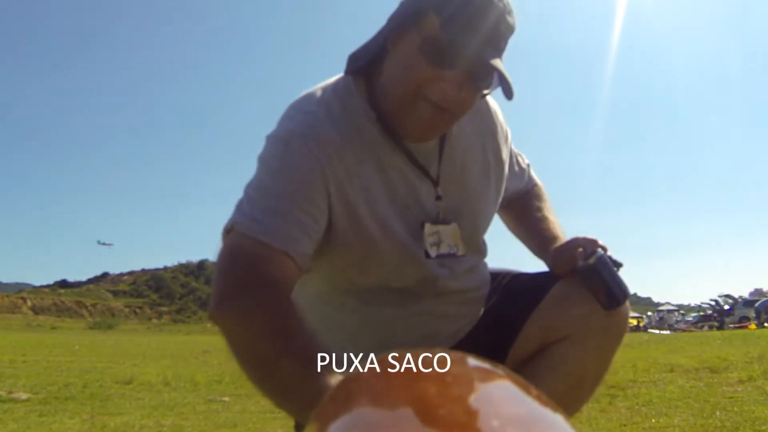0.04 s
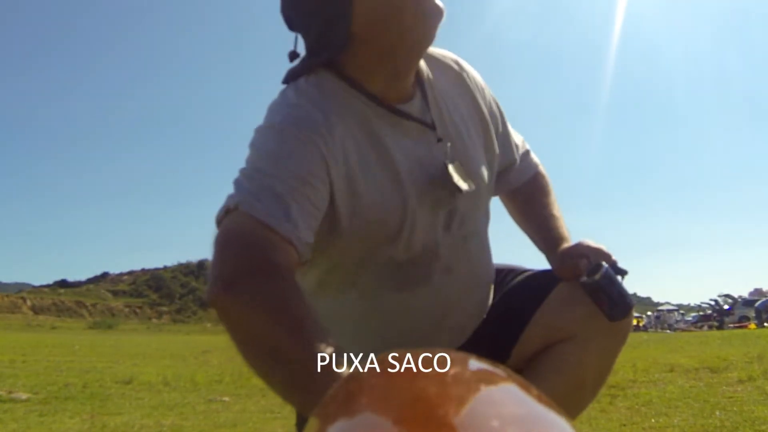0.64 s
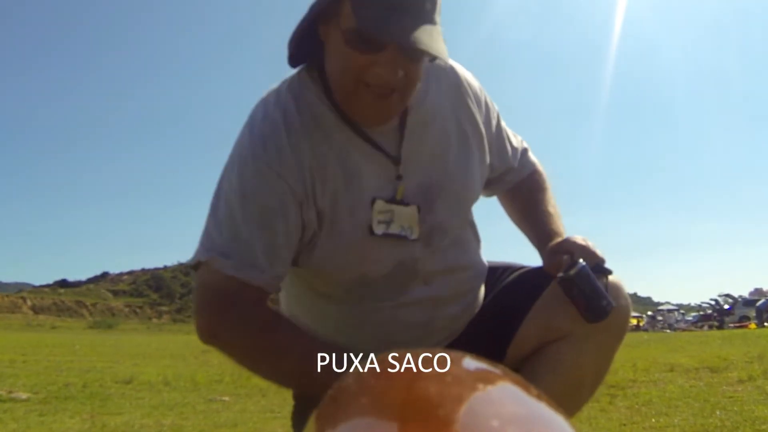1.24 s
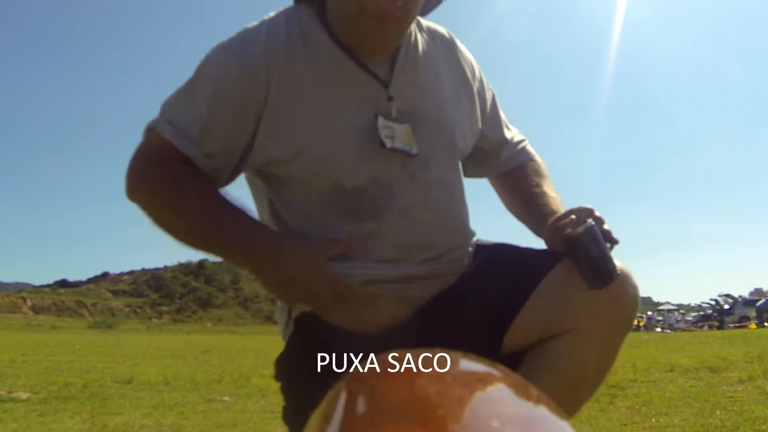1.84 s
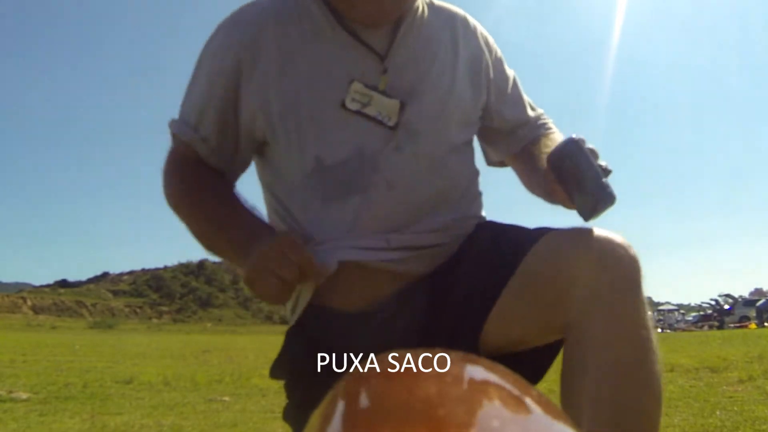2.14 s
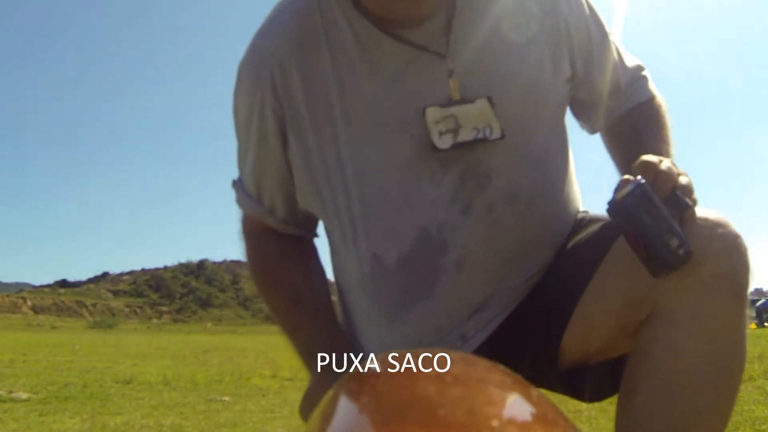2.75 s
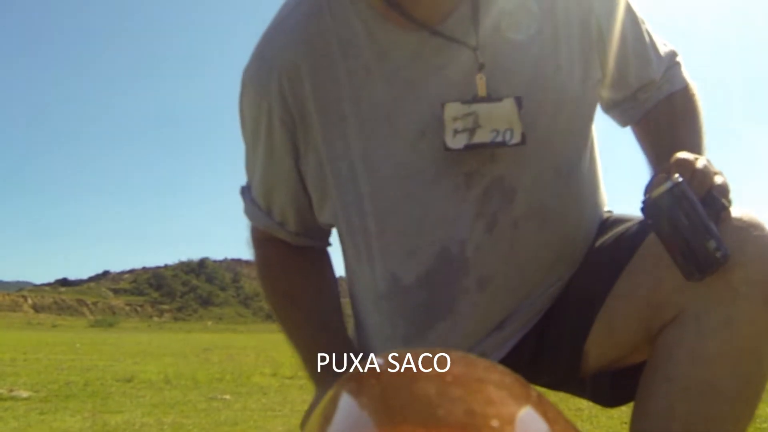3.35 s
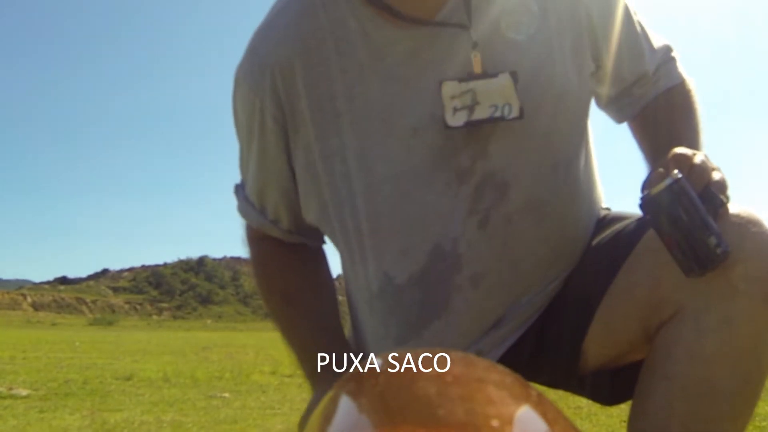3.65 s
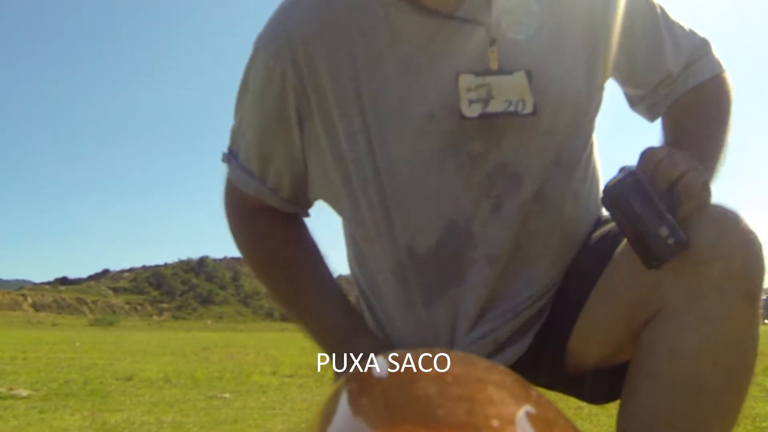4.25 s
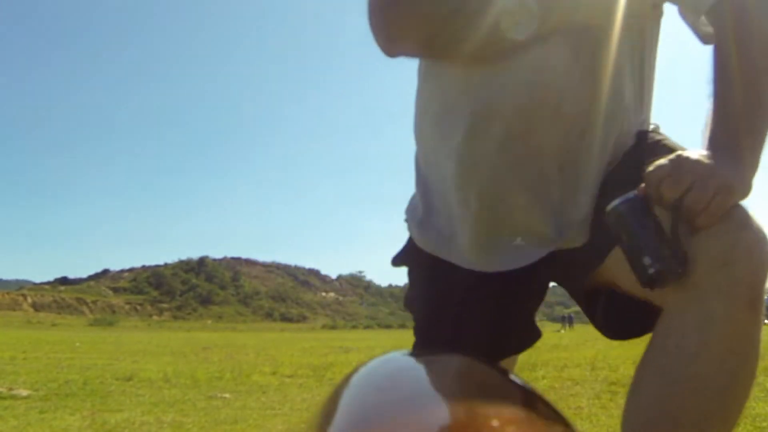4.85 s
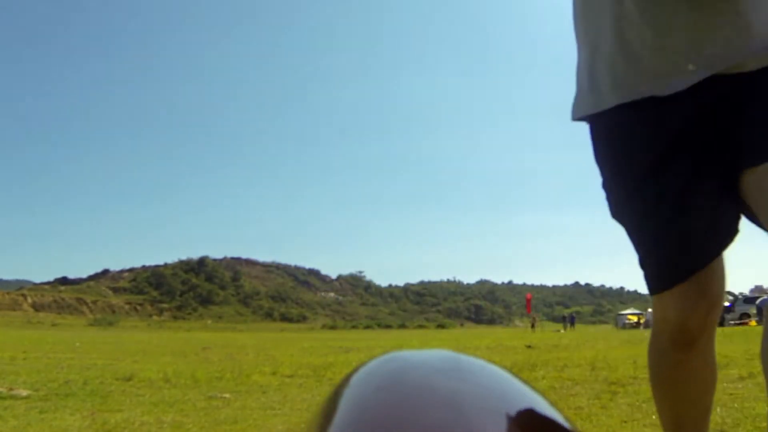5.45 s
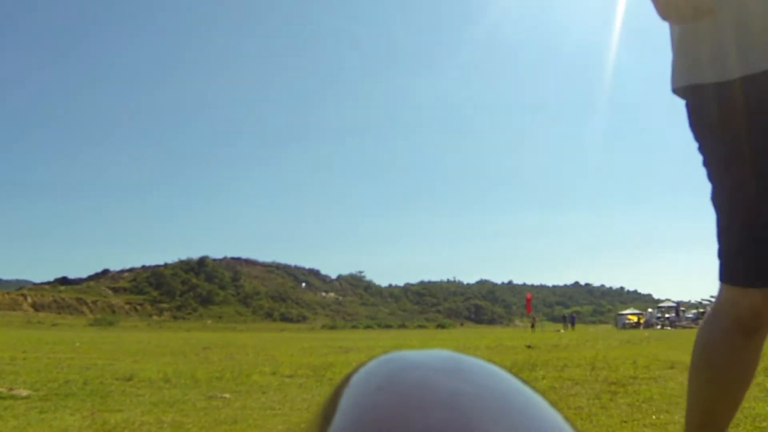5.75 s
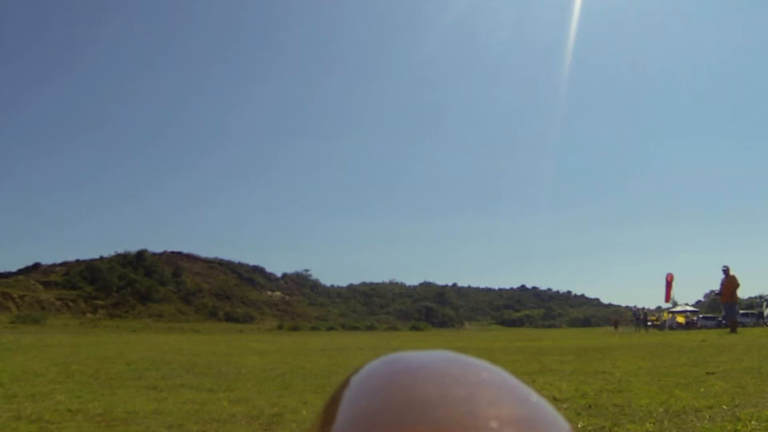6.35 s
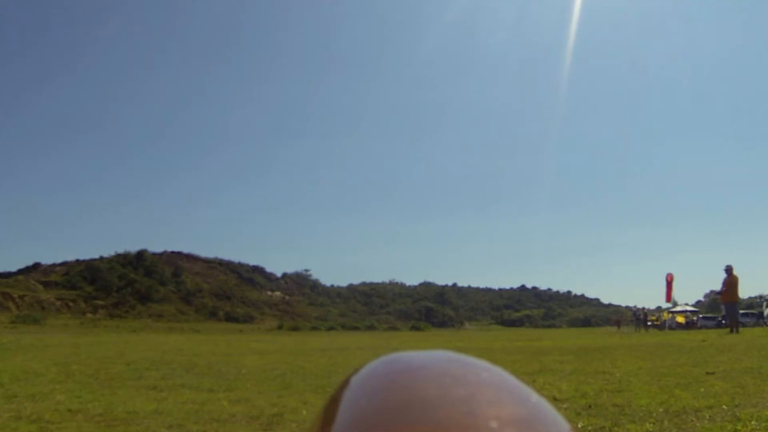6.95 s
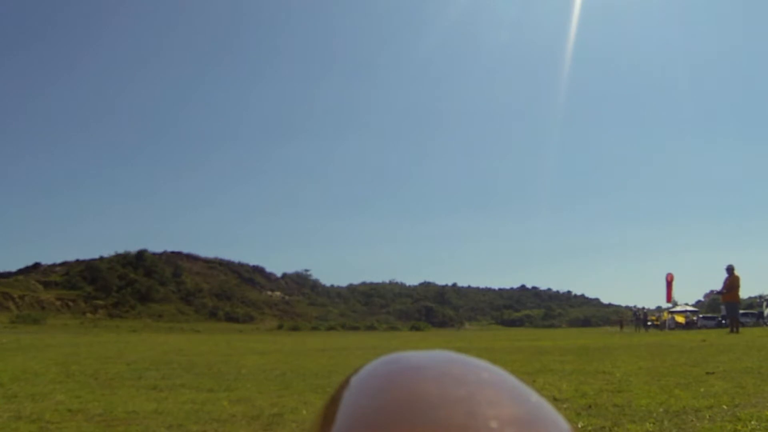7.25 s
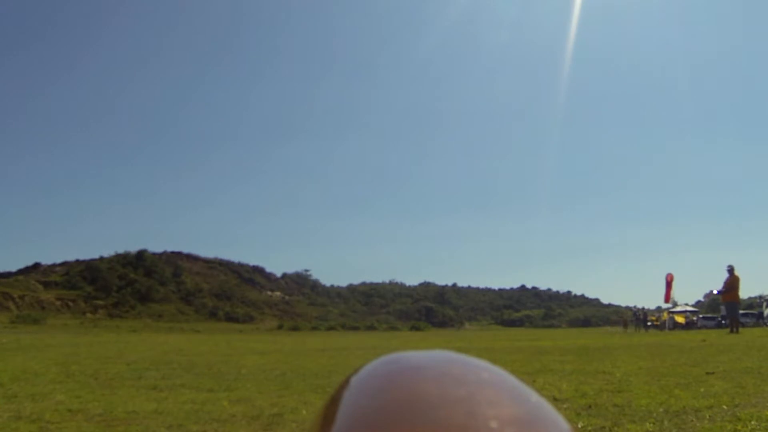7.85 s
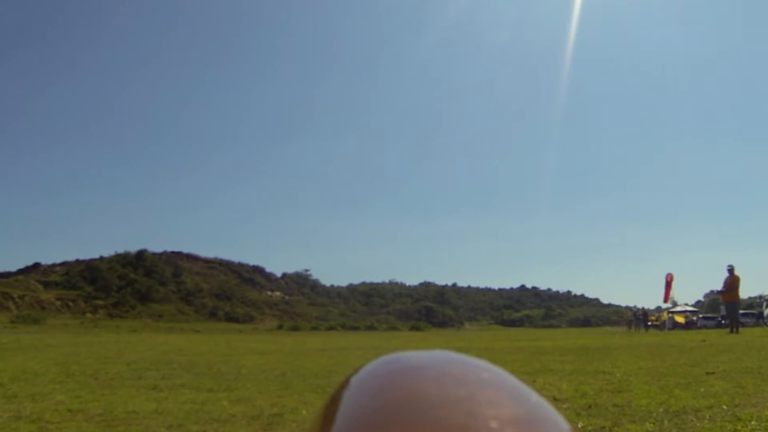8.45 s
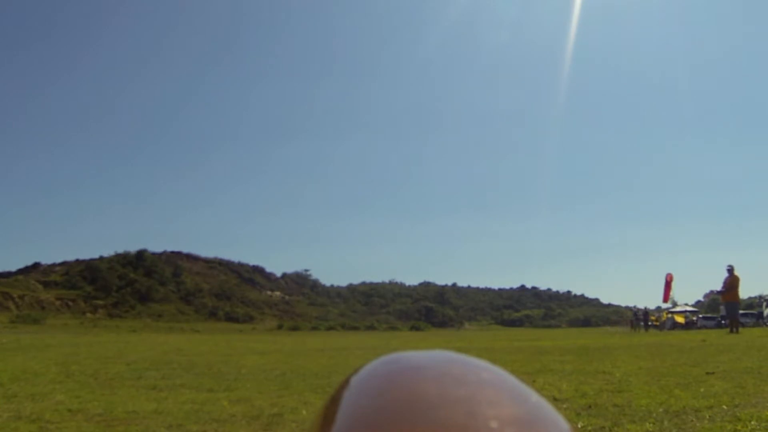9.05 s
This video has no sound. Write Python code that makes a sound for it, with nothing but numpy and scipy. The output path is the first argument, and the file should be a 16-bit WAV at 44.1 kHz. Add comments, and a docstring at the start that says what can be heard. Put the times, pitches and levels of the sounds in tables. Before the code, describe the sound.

A model jet's small turbine idles close up with a high whistle and airy roar, then abruptly spools up for take-off.

```python
"""A model jet's small turbine, close up, from a mono camera microphone riding on the fuselage.
It idles on a grass field: twelve compressor blades whistle over the shaft's overtones and the exhaust roar.
After a hard cut it spools up for take-off: the whistle climbs out of hearing, the roar surges,
and the wheels rumble up through the airframe."""
import sys
import numpy as np
from scipy import signal
from scipy.fft import rfft, irfft, next_fast_len
from scipy.io import wavfile
from scipy.ndimage import uniform_filter1d

SR = 44100
rng = np.random.default_rng(int(sys.argv[2]) if len(sys.argv) > 2 else 0)


def unload_audio(sound):
    """Save the sound as a 16-bit wav file, at the path given as the first command line argument."""
    columns = np.transpose(np.atleast_2d(sound))
    # keep every value between -1 and 1, then stretch to whole-number steps
    steps = np.round(np.clip(columns, -1, 1) * 32767)
    wavfile.write(sys.argv[1], SR, steps.astype(np.int16))


N = 401310
TIME = np.arange(N) / SR
CUT_S = 6.251  # from idle to the take-off roll


def undb(db):
    """Decibels to gain."""
    return 10 ** (np.asarray(db) / 20)


def unit(x):
    """Scale to rms 1."""
    return x / np.sqrt(np.mean(x ** 2))


def curve(table, at=TIME):
    """Read a two-column table, its points joined by lines."""
    return np.interp(at, *np.transpose(table))


def walk(rate):
    """Smooth random wandering with about `rate` turns a second; spread near 1."""
    steps = rng.standard_normal(4096)
    place = TIME * rate
    k = place.astype(int)
    fraction = place - k
    ease = fraction * fraction * (3 - 2 * fraction)
    return steps[k % len(steps)] * (1 - ease) + steps[(k + 1) % len(steps)] * ease


def swell(crest_s, build_s, release_s):
    """Builds up exponentially to 1 at its crest, then rounds off and dies."""
    since = TIME - crest_s
    return np.exp(np.minimum(since, 0) / build_s - (np.maximum(since, 0) / release_s) ** 2)


def turbulence(spectrum, flicker_db, flicker_rate):
    """Octave bands of noise that each flicker alone; rms 1."""
    size = next_fast_len(N, True)
    f = np.maximum(np.fft.rfftfreq(size, 1 / SR), 1)
    hz, db = np.transpose(spectrum)
    noise = rfft(rng.standard_normal(size)) * undb(np.interp(np.log(f), np.log(hz), db))
    noise *= f ** 2 / (f ** 2 + 20 ** 2)  # low cut at 20 Hz
    octave = np.clip(np.round(np.log2(f / 1500)), -4, 3)
    bands = (irfft(noise * (octave == k), size)[:N] for k in np.unique(octave))
    return unit(sum(band * undb(flicker_db * walk(flicker_rate)) for band in bands))


# Dips of the camera's automatic gain: t/s, depth/dB
GAIN_DIPS = [(1.02, 0.3), (4.04, 1.0)]

def camera_gain_dip_db():
    """The camera's gain steps the level down briefly at the listed times, then recovers."""
    return sum(depth_db * swell(s, build_s=0.05, release_s=0.53) for s, depth_db in GAIN_DIPS)


# Wheel rumble, reaching the microphone through the airframe: f/Hz, relative level/dB
WHEEL_SPECTRUM = [(25, -10), (60, 0), (100, -0.5), (190, -1.5), (300, -2), (600, -12), (2000, -46)]

def wheels():
    """Small wheels bump over the turf below, louder as the model gathers speed."""
    start_db, rise_db_per_s, ceiling_db = -57.5, 10, -38
    roll_db = np.minimum(start_db + rise_db_per_s * (TIME - CUT_S), ceiling_db)
    return turbulence(WHEEL_SPECTRUM, flicker_db=2.0, flicker_rate=18) * undb(roll_db)


# Resonances and dips of the fuselage and camera housing: f/Hz, width/Hz, gain/dB
SHELL_BANDS = [(960, 69, -3), (1135, 59, 2), (1232, 57, -4), (1358, 167, -3), (1615, 78, 4), (1824, 134, 9),
               (2112, 173, 6.5), (3130, 140, 2), (5175, 540, 6.5), (5980, 240, -0.5), (6640, 330, 5.5),
               (7370, 810, -10.5), (8650, 250, 2.3), (10400, 320, -6)]

def housing(x):
    """The hollow shell at the microphone lifts some bands and cancels others; rms 1."""
    size = next_fast_len(N, True)
    f = np.fft.rfftfreq(size, 1 / SR)
    db = sum(lift * np.exp(-((f - hz) / width) ** 2) for hz, width, lift in SHELL_BANDS)
    return unit(irfft(rfft(x, size) * undb(db))[:N])


# Exhaust at idle: f/Hz, relative level/dB
IDLE_SPECTRUM = [(30, -15), (75, -8.5), (200, -9.5), (400, -1.1), (750, 0.5), (1500, -4.5), (2600, -7.5),
                 (4000, -10.5), (6000, -14.5), (9000, -14), (11500, -16.5), (15000, -29.5)]

def idle_exhaust(roar_db):
    """The turbulent jet roars evenly, heard close through the housing."""
    roar = housing(turbulence(IDLE_SPECTRUM, flicker_db=0.33, flicker_rate=14))
    return roar * undb(roar_db + 0.3 * walk(12))


# Exhaust with the throttle opening, and at full thrust: f/Hz, relative level/dB
OPENING_SPECTRUM = [(30, -17), (80, -11), (200, -13), (400, -2), (800, 1.5), (1500, -5.5), (2800, -8),
                    (4000, -14), (5500, -18.5), (9000, -11.5), (11500, -17.5), (15000, -33)]
THRUST_SPECTRUM = [(30, -14), (80, -18), (200, -11.5), (400, -4), (750, 1), (1500, -2), (2800, -5.5),
                   (4000, -11), (5500, -21), (9000, -10.5), (11500, -12.5), (15000, -28)]

def takeoff_exhaust(shaft_hz, roar_db):
    """The jet takes on the colour of full thrust as the shaft speeds up."""
    thrust = np.clip((shaft_hz - 980) / 200, 0, 1)
    opening = turbulence(OPENING_SPECTRUM, flicker_db=0.5, flicker_rate=16)
    full = turbulence(THRUST_SPECTRUM, flicker_db=1.0, flicker_rate=16)
    roar = housing(np.sqrt(1 - thrust) * opening + np.sqrt(thrust) * full)
    return roar * undb(roar_db + 0.44 * walk(55))


# Exhaust surges on the roll across the field: crest t/s, level/dB, build-up/s
EXHAUST_SURGES = [(6.52, -19.5, .11), (7.43, -21, 0.23), (7.61, -23, 0.096), (7.9, -20.5, 0.12),
                  (8.23, -21.5, 0.15), (8.35, -23, 0.069), (9.07, -23, .16)]

def surging_roar_db(floor_db=-29):
    """The roar's level: surges add their power to a steady floor."""
    surge_power = sum(undb(db) ** 2 * swell(crest_s, build_s, release_s=0.11)
                      for crest_s, db, build_s in EXHAUST_SURGES)
    return 10 * np.log10(undb(floor_db) ** 2 + surge_power)


def rotor(shaft_hz, whistle_db, hum_db, overtones, fade_db, fade_rate, wander, shimmer_db, blades=12):
    """Tones locked to one shaft: its hum, the blade whistle, and overtones that fade in and out."""
    # the rotor's inertia rounds every change of speed
    speed_hz = uniform_filter1d(shaft_hz, size=9000, mode="nearest") * (1 + wander * walk(14))
    angle = 2 * np.pi * np.cumsum(speed_hz) / SR
    # eddies in the intake shake the whistle slightly in phase and strength
    tones = undb(whistle_db + shimmer_db * walk(45)) * np.sin(blades * angle + 0.03 * walk(160))
    tones += undb(hum_db + 1.1 * walk(14)) * np.sin(angle)
    for multiple, db in overtones:
        tones += undb(db + fade_db * walk(fade_rate)) * np.sin(multiple * angle + 0.28 * walk(40))
    return np.sqrt(2) * tones


# The idling shaft sags and recovers: t/s, f/Hz
IDLE_SHAFT = [(0.04, 805.2), (0.4, 807.0), (1.53, 795.7), (2.99, 786.0), (3.69, 792.2), (5.22, 802.4),
              (5.6, 804.0), (6.2, 800.5)]
# The whistle fades a little and returns: t/s, level/dB
IDLE_WHISTLE_LEVEL = [(0, -18.6), (2.3, -19.5), (3.45, -20.4), (6.2, -18)]
# Shaft overtones at idle: multiple, level/dB, dB gained per dB of roar
IDLE_HARMONICS = [(2, -44, 3), (3, -48.5, 0.5), (4, -54, 0), (5, -58, 3.5), (6, -43.5, 1.4), (7, -63, -4),
                  (8, -64, 2), (10, -62, 2), (11, -50.5, -5.5), (13, -52, -4), (14, -48, 3),
                  (15, -69, 12.5), (16, -73, 7), (18, -64, 0)]

def idling_turbine(gain_dip_db):
    """Standing on the grass at a nearly steady speed, the whistle well above the roar."""
    shaft_hz = curve(IDLE_SHAFT)
    sag_hz = 805 - shaft_hz  # below nominal idle
    whistle_db = curve(IDLE_WHISTLE_LEVEL) - gain_dip_db
    roar_db = -26 + 0.121 * sag_hz - gain_dip_db
    # as the roar swells, most overtones rise with it while the whistle's two neighbours sink
    swell_db = roar_db - roar_db.mean()
    overtones = [(multiple, db + slope * swell_db) for multiple, db, slope in IDLE_HARMONICS]
    tones = rotor(shaft_hz, whistle_db, hum_db=-47, overtones=overtones,
                  fade_db=-1.0, fade_rate=3.6, wander=0.0001, shimmer_db=0.26)
    return tones + idle_exhaust(roar_db)


# The shaft spools up: t/s, f/Hz
SPOOL_SHAFT = [(6.1, 912.3), (6.45, 959.7), (7.2, 1073.4), (8.02, 1203.3), (8.34, 1247.3), (9.1, 1345)]
# The whistle weakens as it climbs: shaft f/Hz, level/dB
SPOOL_WHISTLE_LEVEL = [(933, -22.5), (1005, -28.5), (1080, -25.5), (1135, -29), (1270, -35)]
# The hum nearly drops out at one speed, then grows: shaft f/Hz, level/dB
SPOOL_HUM_LEVEL = [(933, -32.5), (1020, -34), (1120, -36.5), (1150, -44), (1180, -35), (1345, -29)]
# Overtones, each strongest at its own speed: multiple, peak level/dB, shaft f/Hz, width/Hz
SPOOL_HARMONICS = [(2, -39, 990, 110), (3, -38.5, 1087, 120), (5, -60, 1020, 125), (6, -45.5, 1140, 220),
                   (7, -55, 1140, 125), (8, -49, 1160, 110), (9, -58, 1200, 125), (10, -40.5, 1120, 90),
                   (11, -45, 1020, 200), (13, -50, 1125, 150), (14, -58, 980, 200), (15, -55, 960, 125),
                   (16, -63, 940, 125)]

def spooling_turbine(choke_above_db=-23, off_speed_db=-15):
    """The shaft accelerates beside the microphone; surges lift hum and overtones, choke the whistle."""
    shaft_hz = curve(SPOOL_SHAFT)
    roar_db = surging_roar_db()
    surge_db = roar_db - roar_db[TIME > CUT_S].mean()
    choke_db = 2.6 * np.maximum(roar_db - choke_above_db, 0)
    whistle_db = curve(SPOOL_WHISTLE_LEVEL, at=shaft_hz) - choke_db
    hum_db = curve(SPOOL_HUM_LEVEL, at=shaft_hz) + 0.88 * surge_db
    overtones = []
    for multiple, db, peak_hz, width_hz in SPOOL_HARMONICS:
        off_speed = 1 - np.exp(-((shaft_hz - peak_hz) / width_hz) ** 2)
        overtones.append((multiple, db + 0.49 * surge_db + off_speed_db * off_speed))
    tones = rotor(shaft_hz, whistle_db, hum_db, overtones,
                  fade_db=3.0, fade_rate=6, wander=0.00014, shimmer_db=0.5)
    return tones + takeoff_exhaust(shaft_hz, roar_db)


def scene(fade_out_s=0.001, fade_in_s=0.006):
    """On board: idling, then an abrupt cut to the take-off roll; both channels are alike."""
    splice = np.minimum(np.maximum((CUT_S - TIME) / fade_out_s, (TIME - CUT_S) / fade_in_s), 1)
    idle = idling_turbine(camera_gain_dip_db())
    mono = splice * np.where(TIME < CUT_S, idle, spooling_turbine() + wheels())
    return np.array([mono, mono])


def record(dry):
    """The camera on the fuselage cuts the top steeply."""
    top_hz = 15250
    return signal.sosfiltfilt(signal.ellip(10, 0.05, 60, top_hz, fs=SR, output="sos"), dry)


dry = scene()
out = record(dry)
unload_audio(out)
```